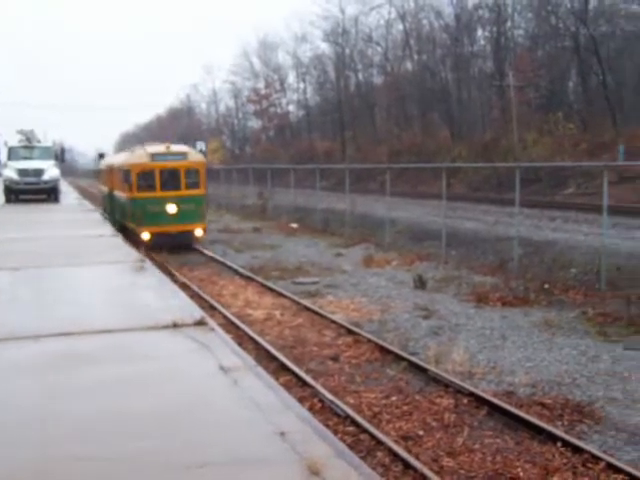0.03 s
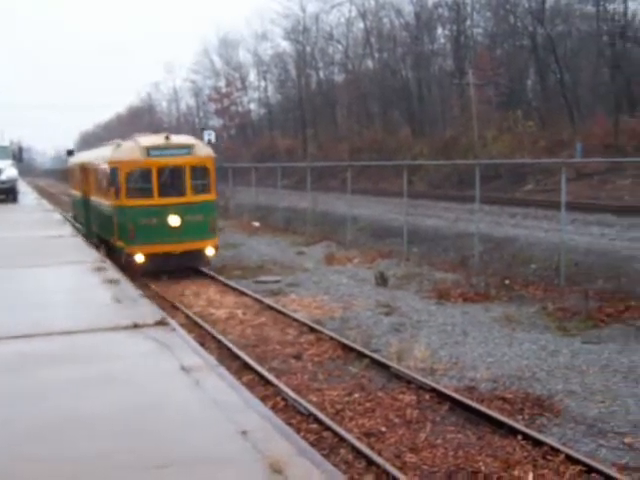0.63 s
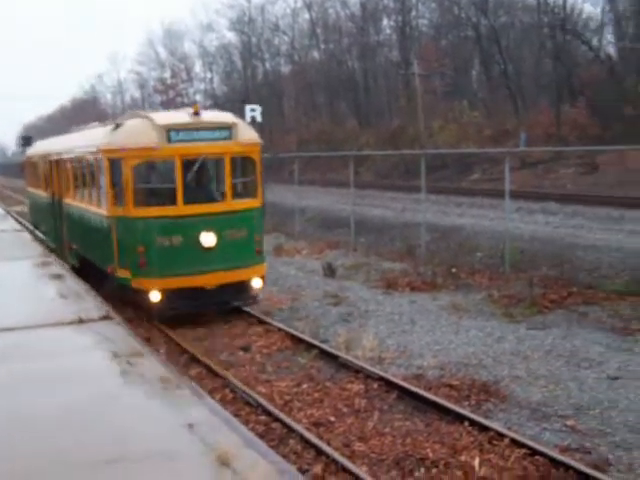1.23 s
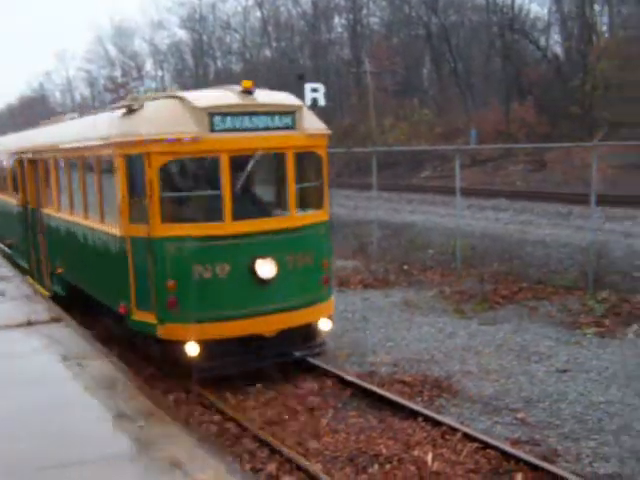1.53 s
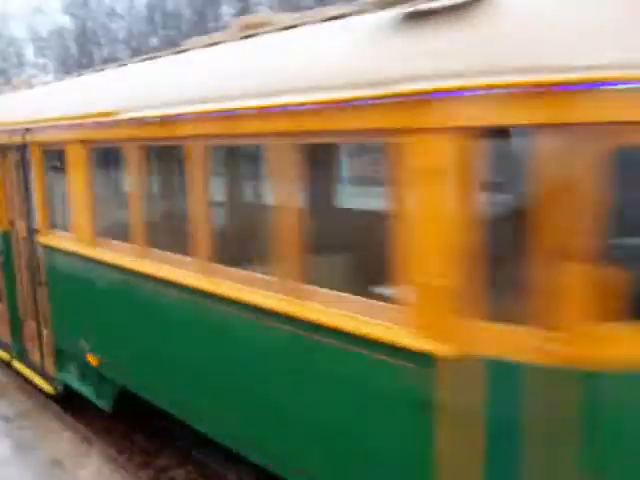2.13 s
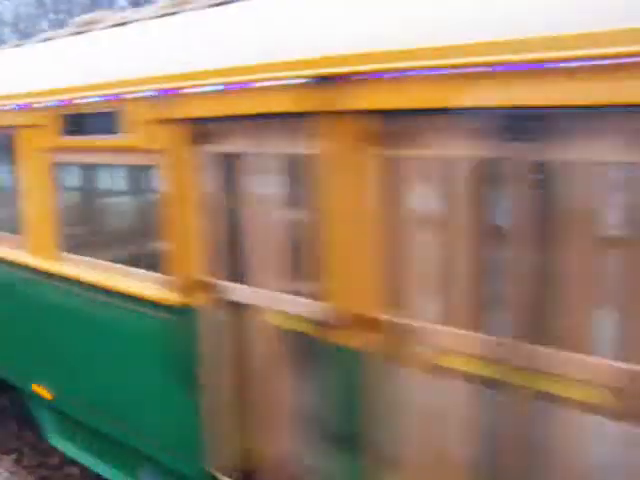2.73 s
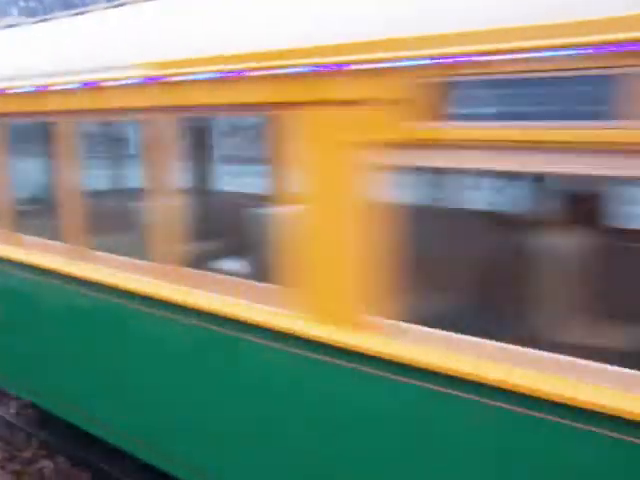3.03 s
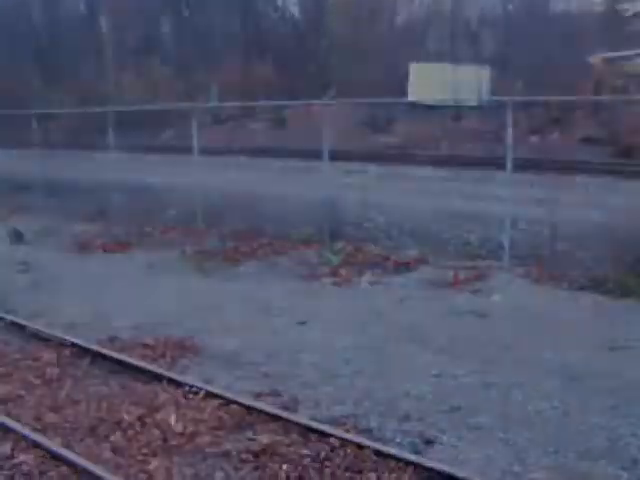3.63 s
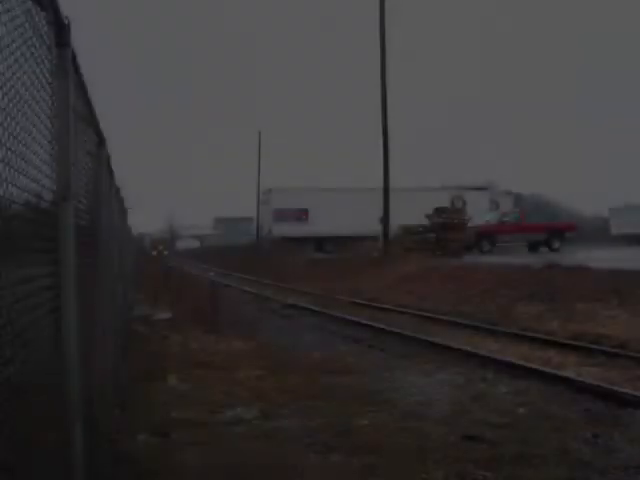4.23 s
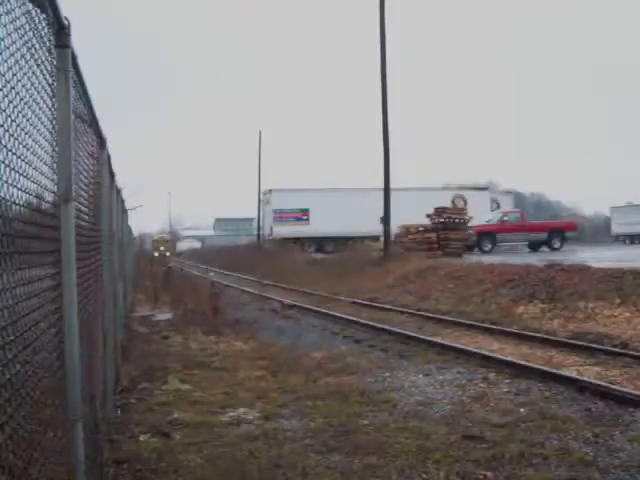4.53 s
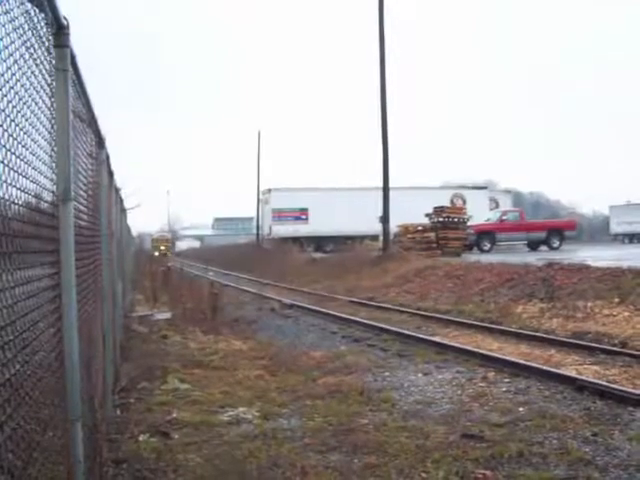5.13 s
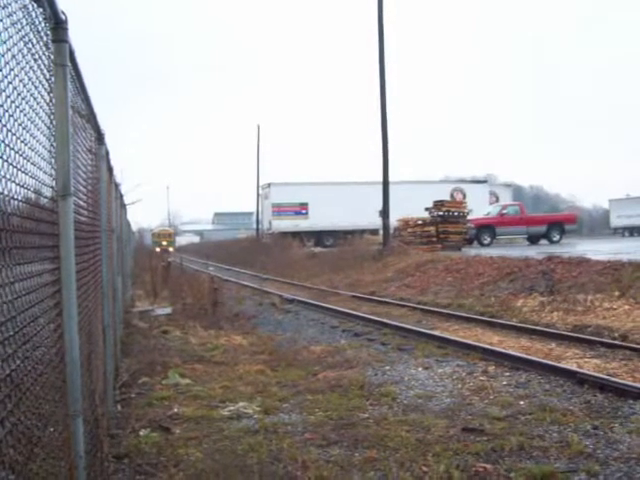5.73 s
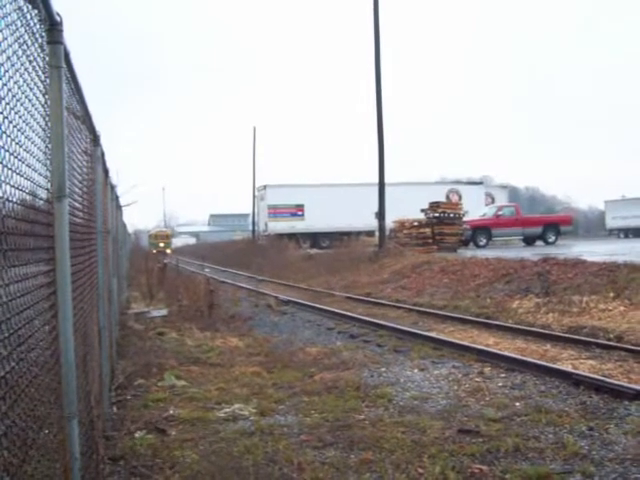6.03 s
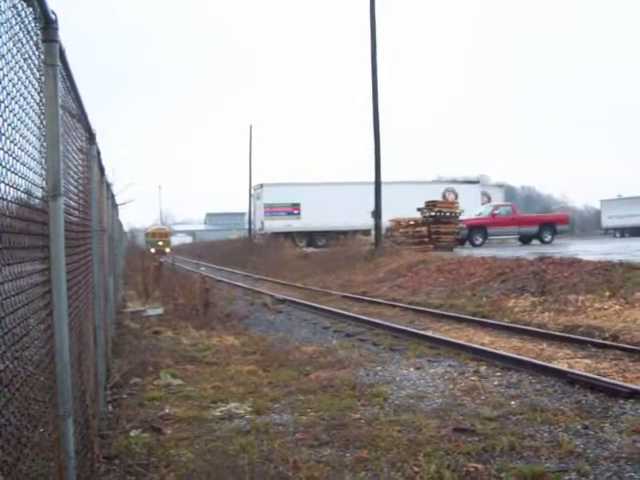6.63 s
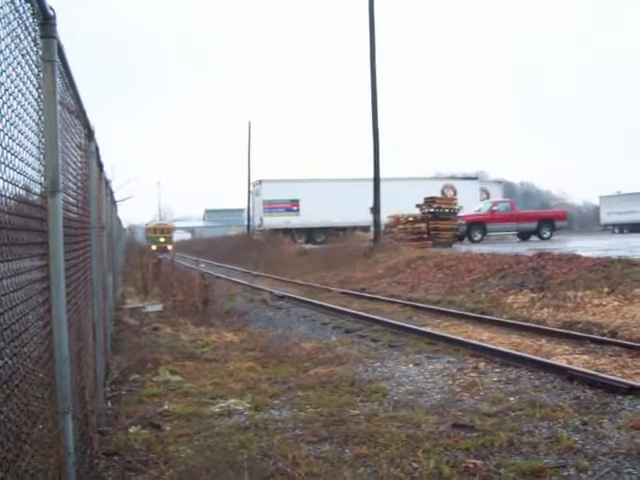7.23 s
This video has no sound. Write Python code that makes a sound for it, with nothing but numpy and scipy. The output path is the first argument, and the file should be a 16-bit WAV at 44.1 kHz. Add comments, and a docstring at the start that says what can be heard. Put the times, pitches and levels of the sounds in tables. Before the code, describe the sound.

An old streetcar approaches and passes close by, its body rumbling and its steel wheels hissing and ringing. A wheel knocks about five times a second amid deep thuds, clatter over rail joints and a gear growl. The car fades out, and a much quieter trackside fades in with distant traffic, an idling engine, wind on the microphone and faint scrapes and bumps.

```python
"""An old streetcar rumbles past close by, its steel wheels hissing and ringing on the rough rail.
A flat spot on a wheel knocks five times a second, the body thuds on its springs, and the trucks
(the frames that hold the wheels) growl with their gears and clatter over rail joints. The car fades
out and a quieter trackside fades in: far traffic, an idling engine, wind, faint scrapes and bumps.
It is all heard through a microphone that misses the highest treble."""
import sys
import numpy as np
from scipy import signal
from scipy.fft import rfft, irfft
from scipy.io import wavfile
from scipy.ndimage import map_coordinates

SR = 44100
rng = np.random.default_rng(int(sys.argv[2]) if len(sys.argv) > 2 else 0)


def store_wav(level_fs):
    """Save 16-bit WAV to argv[1]."""
    pcm = np.round(np.clip(np.atleast_2d(level_fs), -1, 1) * 32767)
    wavfile.write(sys.argv[1], SR, pcm.T.astype(np.int16))


N = 321048
TIME = np.arange(N) / SR
FREQ = np.fft.rfftfreq(N, 1 / SR)


def gain_of(db):
    """Turns decibels into a number to multiply a sound by."""
    return 10 ** (np.asarray(db) / 20)


def unit_level(x):
    """Scales a sound to an average (rms) level of 1."""
    return x / np.sqrt(np.mean(x ** 2) + 1e-20)


def spectrum(points):
    """Joins (Hz, dB) points into a curve over all pitches."""
    hz, db = np.transpose(points)
    return np.interp(np.log(FREQ + 1), np.log(hz + 1), db)


def colour(x, db):
    """Filters x by a dB curve, to level 1; a click rings only after it lands."""
    log_gain = np.maximum(db, -100) * np.log(10) / 20
    cepstrum = irfft(log_gain, N)
    cepstrum[1:N // 2] *= 2
    cepstrum[N // 2 + 1:] = 0
    return unit_level(irfft(rfft(x) * np.exp(rfft(cepstrum)), N))


def low_pass(x, hz):
    """Cuts off everything above a pitch."""
    taps = signal.firwin(401, hz, window=("kaiser", 8), fs=SR)
    return signal.oaconvolve(x, taps[None], "same")


def noise(size=N):
    """Plain white noise."""
    return rng.standard_normal(size)


def drift(hz, size=1024):
    """A random wobble, about 1 in size, up to hz times a second."""
    return np.sqrt(3 / 2) * np.interp(2 * hz * TIME, np.arange(size), noise(size), period=size)


def grit(per_s, spread_db, share):
    """Noise mixed with a share of tiny, uneven impacts."""
    sizes = gain_of(spread_db * np.minimum(rng.exponential(1, N), 4))
    impacts = sizes * np.sign(noise()) * (rng.random(N) < per_s / SR)
    return np.sqrt(share) * unit_level(impacts) + np.sqrt(1 - share) * noise()


def fuzzy_tone(hz, width, size=N):
    """The rough note of something rubbed without pause."""
    offset = np.fft.rfftfreq(size, 1 / SR) - hz
    return unit_level(irfft(rfft(noise(size)) / (1 + (2.3 * offset / width) ** 2), size))


def add(mix, s, sound):
    """Adds a sound to the mix at s seconds."""
    part = mix[max(round(s * SR), 0):][:len(sound)]
    part += sound[:len(part)]


def hump(at_s, width_s):
    """A bell-shaped rise and fall around a moment."""
    return np.exp(-((TIME - at_s) / width_s) ** 2)


def swells(rows):
    """The power of brief swells, each rising and falling in one arch."""
    return sum(gain_of(db) ** 2 * np.sin(np.pi * np.clip((TIME - s) / length, 0, 1)) ** 2
               for s, length, db in rows)


def fade(silent_s, full_s, power):
    """A volume knob turned between silence and full level."""
    return np.clip((TIME - silent_s) / (full_s - silent_s), 0, 1) ** power


def struck_notes(rows, rise_s=0.00099):
    """Each blow sounds one note, which drops 60 dB over its ring time."""
    t, out = np.arange(SR // 4) / SR, np.zeros(N)
    attack = 1 - np.exp(-t / rise_s)
    for s, hz, db, ring_s in rows:
        add(out, s, attack * gain_of(db - 60 * t / ring_s) * np.sin(2 * np.pi * hz * t))
    return out


# The idling engine and a faint whine. Each row: pitch in Hz, level in dB.
IDLE_TONES = [(32.3, -43.5), (152, -47), (200, -40), (231, -51), (1227, -57.5), (2309, -74.5)]


def idling_engine(waver_db=2.5, waver_hz=3.49):
    """An engine hums, each tone wavering in level and pitch."""
    out = np.zeros(N)
    for hz, db in IDLE_TONES:
        level = np.sqrt(2) * gain_of(db + waver_db * drift(9.2))
        pitch = hz + waver_hz * drift(8)
        out += level * np.sin(2 * np.pi * np.cumsum(pitch) / SR)
    return out


# The tone of wind, far traffic and high hiss. Each row: pitch in Hz, relative level in dB.
WIND_TONE = [(10, -20), (22, -2.5), (34, -9), (52, -1), (63, -3), (75, -10.5), (110, -10.5), (300, -63)]
TRAFFIC_TONE = [(60, -31.5), (100, -6.5), (135, 2.5), (220, 4), (300, 1), (420, -1.5), (560, 1),
                (680, -4.5), (830, -11.5), (1100, -17.5), (2000, -23), (5000, -44.5)]
AIR_TONE = [(500, -18), (1200, 1), (2050, -4.5), (2450, 0.5), (3150, -4), (3600, -3.5), (4400, -5),
            (5400, -11), (7000, -19), (8000, -34.5)]
# How the trackside grows louder. Each row: time in seconds, traffic gain in dB, hiss gain in dB.
TRACKSIDE_LEVELS = [(4.8, -39, -53), (5.2, -33, -46.5), (5.5, -30.5, -47), (5.9, -29, -44.5),
                    (6.2, -25.5, -41), (6.55, -25, -43), (7.0, -28, -43), (7.28, -25.5, -39)]
# Brief swells of hiss. Each row: start in seconds, length in seconds, level in dB.
AIR_SWELLS = [(6.09, 0.13, -39), (6.27, 0.11, -41.5), (6.93, 0.12, -42), (7.24, 0.03645, -31.5)]


def trackside(wind_db=-6.5, surge_db=0.9):
    """Wind buffets the microphone over far traffic, an engine and a swelling hiss."""
    times, *columns = np.transpose(TRACKSIDE_LEVELS)
    traffic_gain, hiss_gain = (gain_of(np.interp(TIME, times, db)) for db in columns)
    hiss_gain = np.sqrt(hiss_gain ** 2 + swells(AIR_SWELLS))
    wind = colour(noise(), spectrum(WIND_TONE)) * gain_of(wind_db)
    traffic = colour(grit(per_s=260, spread_db=2, share=0.16), spectrum(TRAFFIC_TONE))
    traffic *= gain_of(-1 + surge_db * drift(5))
    hiss = colour(grit(per_s=240, spread_db=3, share=0.15), spectrum(AIR_TONE))
    hiss *= gain_of(0.7 + 0.5 * drift(67))
    engine = idling_engine() / np.median(traffic_gain[-2 * SR:])
    return traffic_gain * (wind + traffic + engine) + hiss_gain * hiss


# Faint scrapes. Each row: start and length in seconds, pitch and width in Hz, level in dB.
SCRAPES = [(6.133, 0.06906, 3900, 2598, -39.5), (6.723, 0.054, 2250, 1100, -34.5),
           (6.725, 0.06703, 3950, 900, -38), (6.791, 0.014, 6800, 1101, -40),
           (6.765, 0.19, 2762, 1500, -39), (7.092, 0.2, 4240, 400, -46), (7.137, 0.074, 2750, 1200, -37.5),
           (7.248, 0.01774, 2899, 2600, -36)]


def scrapes(rise_s=0.0079, grain_db=1.5):
    """Grainy scrapes catch quickly and trail off."""
    out = np.zeros(N)
    for s, length, hz, width, db in SCRAPES:
        t = np.arange(round(length * SR)) / SR
        envelope = (1 - np.exp(-t / rise_s)) * np.sqrt(1 - t / length)
        add(out, s, gain_of(db) * envelope * fuzzy_tone(hz, width, size=SR)[:len(t)])
    return out * gain_of(grain_db * drift(79))


# One faint squeal: start and length in seconds, first and last pitch in Hz, level in dB.
SQUEAL = (6.5, .15, 2900, 3502, -44)


def squeal(waver_hz=35):
    """A thin, unsteady tone glides upward on its own, just before a run of scrapes."""
    s, length, from_hz, to_hz, db = SQUEAL
    hz = np.interp(TIME, [s, s + length], [from_hz, to_hz]) + waver_hz * drift(60)
    return np.sqrt(2 * swells([(s, length, db)])) * np.sin(2 * np.pi * np.cumsum(hz) / SR)


# Dull bumps. Each row: start in seconds, pitch in Hz, level in dB, ring time in seconds.
BUMPS = [(5.475, 202.8, -23.5, 0.18), (6.249, 522.1, -14, 0.03108), (7.125, 190, -22, 0.037),
         (7.232, 540.4, -13, 0.038)]


def bumps():
    """Short, low notes bump at the trackside."""
    return struck_notes(BUMPS)


# The two trucks going by. Each row: time in seconds, hiss in dB, gear level in dB, gear pitch in Hz.
TRUCKS = [(2.26, -24.5, -26, 576), (3.22, -32, -27, 620)]
# The gears' tones. Each row: share of the gear pitch, width in Hz, relative level in dB.
GEAR_TONES = [(.5, 55, -6), (1, 86, -0.5)]


def gears(lumps_db=3, lag_s=0.09, width_s=0.19):
    """Each drive gives a lumpy growl, loudest from close beside its truck."""
    out = np.zeros(N)
    for s, _, truck_db, hz in TRUCKS:
        for share, width, db in GEAR_TONES:
            level = gain_of(truck_db + db + lumps_db * drift(12))
            out += hump(s + lag_s, width_s) * level * fuzzy_tone(share * hz, width)
    return out


# The front wheels' notes. Each row: pitch in Hz, width in Hz, level in dB.
WHEEL_NOTES = [(1568, 93, -32), (2810, 150, -38.5), (3540, 170, -37.5)]


def singing_wheels(peak_s=1.4, width_s=0.62, flutter_db=4):
    """The front wheels ring on the rail as they draw near."""
    tones = sum(gain_of(db + flutter_db * drift(9)) * fuzzy_tone(hz, width)
                for hz, width, db in WHEEL_NOTES)
    return hump(peak_s, width_s) * tones


def receding(near_db, from_s, db_per_s, far_db):
    """A level that holds, then sinks as the car moves away."""
    return gain_of(np.maximum(near_db - db_per_s * np.maximum(TIME - from_s, 0), far_db))


# How rumble and hiss sink. Each: near gain in dB, start in seconds, dB lost a second, far gain in dB.
RUMBLE_FALL = (-16.5, 1.95, 6.5, -25.5)
HISS_FALL = (-27, 2, 8, -43.5)
# A wheel's rim rubs the rail. Each row: start in seconds, length in seconds, hiss gain in dB.
RIM_RUBS = [(.22, 0.23235, -27.5), (1.38, 0.2428, -29), (1.742, 0.037, -21.5), (2.2, 0.11, -30),
            (2.72, 0.3, -36.5), (3.04, 0.24, -38.5), (3.35, 0.1968, -34.5)]


def rolling_levels(rumble_dip_db=-4.5, hiss_dip_db=-1.5, dip_after_s=0.053):
    """Hiss rises with each truck and rub; rumble and hiss dip briefly after each joint."""
    dip = sum(hump(s + gap + dip_after_s, width_s=0.026) for s, gap, *_ in RAIL_JOINTS)
    alongside = sum((gain_of(db) * hump(s, width_s=0.35)) ** 2 for s, db, *_ in TRUCKS)
    hiss = np.sqrt(receding(*HISS_FALL) ** 2 + alongside + swells(RIM_RUBS))
    return receding(*RUMBLE_FALL) * gain_of(rumble_dip_db * dip), hiss * gain_of(hiss_dip_db * dip)


def wheel_boost(peaks):
    """The dB a wheel adds to contact noise near the pitches it rings at."""
    return sum(db / (1 + (2 * (FREQ - hz) / width) ** 2) for hz, width, db in peaks)


def flaring(x, depth_db=1.6, band_hz=65, flare_s=0.06):
    """Lets narrow bands of pitch swell and sink, each at its own moments."""
    frames = dict(nperseg=2048, noverlap=1536)
    hz, s, bands = signal.stft(x, SR, **frames)
    grid = np.meshgrid(hz / band_hz, s / flare_s, indexing="ij")
    flares = unit_level(map_coordinates(noise(bands.shape), grid, order=1, mode="mirror"))
    _, flared = signal.istft(bands * gain_of(depth_db * flares), **frames)
    return unit_level(flared[:N])


# The tone of the body's rumble and of steel on steel. Each row: pitch in Hz, relative level in dB.
BODY_TONE = [(20, -16), (60, -4.5), (85, -15), (125, 1), (220, -1), (285, 0.5), (365, -2), (450, 3),
             (560, 0.5), (680, -1), (900, -10.5), (1150, -17), (2200, -20), (6000, -56.5)]
STEEL_TONE = [(300, -30.5), (900, 3), (1400, -1.5), (2150, -0.5), (3100, 1), (4900, 1), (5600, -4),
              (6400, -6), (7000, -10.5), (7500, -13.5), (8000, -25)]
# Where the front and rear wheels ring. Each row: pitch in Hz, width in Hz, boost in dB.
FRONT_PEAKS = [(1577, 170, 10), (2619.2, 280, 5), (3584, 200, 6.5), (4370, 220, 6)]
REAR_PEAKS = [(1530, 400, 11), (2770, 100, 6), (3470, 240, 7), (4580, 280, 6)]


def rolling(handover_s=2.09, handover_length_s=0.8, pitch_wander=0.014):
    """Rough rail shakes the body and rings the wheels, first the front ones, then the rear."""
    rumble_gain, hiss_gain = rolling_levels()
    body = colour(grit(per_s=330, spread_db=1, share=0.27), spectrum(BODY_TONE))
    front, rear = (colour(grit(per_s=1100, spread_db=1, share=0.15),
                          spectrum(STEEL_TONE) + wheel_boost(peaks))
                   for peaks in (FRONT_PEAKS, REAR_PEAKS))
    passed = np.clip(0.5 + (TIME - handover_s) / handover_length_s, 0, 1)
    steel = np.sqrt(1 - passed) * front + np.sqrt(passed) * rear
    # the contact point wanders over the wheel, so the ringing wavers in pitch
    position = np.arange(N) + np.cumsum(pitch_wander * drift(7))
    steel = flaring(map_coordinates(steel, [position], order=3, mode="mirror"))
    body *= gain_of(-0.1 + 1.1 * drift(19))
    steel *= gain_of(2.5 + 0.97 * drift(27))
    return rumble_gain * body + hiss_gain * steel


# Deep, dead thuds. Each row: start in seconds, pitch in Hz, peak level in dB.
THUDS = [(0.536, 185.7, -9), (0.574, 190, -10), (0.653, 151, -11.5), (0.733, 160, -13), (0.801, 164, -4.5),
         (0.858, 135, -12), (1.648, 167, -10.5), (2.56, 135, -17), (2.665, 286, -6), (2.921, 139.9, -17),
         (2.942, 151.7, -21)]


def thuds(peak_s=0.0061):
    """The body bounces on its springs and settles in two or three swings."""
    t, out = np.arange(SR // 8) / SR, np.zeros(N)
    envelope = (t / peak_s * np.exp(1 - t / peak_s)) ** 2
    for s, hz, db in THUDS:
        add(out, s, gain_of(db) * envelope * np.sin(2 * np.pi * hz * t))
    return out


# Struck steel. Each row: start in seconds, pitch in Hz, level in dB, ring time in seconds.
STEEL_RINGS = [(1.708, 1352, -12.5, 0.11), (1.875, 1330, -14.5, 0.1)]


def steel_rings():
    """Now and then a blow sets one steel part ringing."""
    return struck_notes(STEEL_RINGS)


# The struck body's notes. Each row: pitch in Hz, relative level in dB, ring time in seconds.
BODY_NOTES = [(129.37, -10.5, 0.63), (180.99, -6, 0.077), (295, -4, 0.081), (334.52, -0.5, 0.039),
              (432, -5, 0.057), (555, -2.5, 0.073), (716, -7, 0.063), (863.5, -6.5, 0.12)]


def body_thump(t, centre_hz, rise_s=0.0014, detune=0.033, focus_db=9, lowest_hz=120):
    """A blow rings the body, favouring notes near centre_hz; each lands a little differently."""
    thump = np.zeros(len(t))
    for hz, db, ring_s in BODY_NOTES:
        envelope = gain_of(db - focus_db * np.log2(hz / centre_hz) ** 2 - 60 * t / ring_s)
        pitch = hz * (1 + detune * rng.normal())
        thump += envelope * np.sin(2 * np.pi * (pitch * t + 0.11 * rng.normal()))
    # the panels give off little sound below their lowest note
    bass_cut = signal.butter(3, lowest_hz, "highpass", fs=SR, output="sos")
    return signal.sosfilt(bass_cut, thump * (1 - np.exp(-t / rise_s)) ** 2)


def bouncing(strike, count=3, gap_s=0.0018, step_db=-4.5):
    """A struck wheel rebounds quickly, weaker each time."""
    out = strike.copy()
    for bounce, s in enumerate(np.cumsum(gap_s * rng.uniform(0.5, 1.5, count)), 1):
        add(out, s, gain_of(step_db * bounce) * strike)
    return out


# The flat spot, one row for each wheel turn. Each row: thump in dB, clank in dB.
FLAT_SPOT = [(-12.5, -29.5), (-16, -40.5), (-22, -30), (-12.5, -20), (-10, -14), (-11.5, -15),
             (-10.5, -18.5), (-15, -30), (-19.5, -29), (-21.5, -24), (-12.5, -14.5), (-12, -30),
             (-11.5, -25.5), (-16.5, -29), (-18, -38), (-20, -44)]
# A joint gives two blows, off one rail and onto the next.
# Each row: start and gap in seconds, then first thump, second thump, clank and rattle in dB.
RAIL_JOINTS = [(1.6922, 0.024, -7, -13.5, -21.5, -20), (1.873, 0.02025, -21, -19.5, -22.5, -34),
               (2.772, .016, -13.5, -21, -26, -47), (2.922, 0.023, -17.5, -16, -27, -34.5),
               (3.617, .019, -19, -22, -29, -41), (3.757, 0.036, -19.5, -20.5, -28, -33.5)]
# Jolts of the trucks and loose gear.
# Each row: start in seconds, thump, clank and rattle in dB, the thump's centre pitch in Hz.
JOLTS = [(0.102, -15.5, -34.5, -34, 447.3), (0.183, -17, -31, -32, 458), (0.305, -16, -35, -39, 553),
         (0.758, -9, -22.5, -36, 332), (0.801, -20.5, -32, -29, 163), (1.232, -18, -23.5, -41, 397.6),
         (1.272, -14, -38.5, -39.5, 437), (1.656, -26, -29.5, -21, 268.3), (1.8135, -19.5, -32, -18, 277.9),
         (1.837, -24, -23.5, -32.5, 330), (1.852, -13, -29.5, -38, 480),
         (2.337, -18.5, -33.5, -31.5, 579.2), (2.557, -16, -27, -22, 318.4),
         (2.722, -18.5, -21.5, -20, 274), (3.04, -21.5, -33, -29.5, 390), (3.187, -25, -36.5, -34, 644),
         (3.58, -26, -38, -48, 520)]


def blows(first_s=0.1492, turn_s=0.1939, flat_spot_hz=390, joint_hz=412):
    """Lists every blow from the flat spot, joints and jolts, laid out like a row of JOLTS."""
    for turn, (thump, clank) in enumerate(FLAT_SPOT):
        yield first_s + turn * turn_s, thump, clank, clank - 7, flat_spot_hz
    for s, gap, first, second, clank, rattle in RAIL_JOINTS:
        yield s, first, clank, rattle, joint_hz
        yield s + gap, second, clank - 0.5, rattle - 0.5, joint_hz
    yield from JOLTS


# The tone of a truck's clank. Each row: pitch in Hz, relative level in dB.
CLANK_TONE = [(150, -24), (400, -5.5), (800, 6), (1350, -1), (1800, 1.5), (2300, -3.5), (3000, -15.5),
              (7000, -27)]


def knocks(rise_s=0.0004, rattle_s=0.09, chatter_s=0.055, chatter_size=0.45):
    """At each blow the truck clanks, loose parts chatter, the wheel rattles and the body thumps."""
    t, out = np.arange(SR // 4) / SR, np.zeros(N)
    head = round(0.012 * SR)  # a blow's levels are set over its first 12 ms
    clank_tone = spectrum(CLANK_TONE) + 0.45 * wheel_boost(FRONT_PEAKS)
    rattle_tone = spectrum(STEEL_TONE) + wheel_boost(FRONT_PEAKS)
    chatter_noise = colour(noise(), clank_tone)
    rattle_noise = colour(grit(per_s=810, spread_db=3.5, share=0.17), rattle_tone)
    strike = colour(signal.unit_impulse(N), clank_tone)[:len(t)]
    strike /= np.std(strike[:head])
    attack = 1 - np.exp(-t / rise_s)
    for s, *levels_db, centre_hz in blows():
        here = (round(s * SR) + np.arange(len(t))) % N
        thump = body_thump(t, centre_hz)
        chatter = attack * chatter_noise[here] * gain_of(-60 * t / chatter_s)
        clank = bouncing(strike) + chatter_size * chatter
        rattle = attack * rattle_noise[here] * gain_of(-60 * t / rattle_s)
        for db, part in zip(levels_db, (thump, clank, rattle)):
            add(out, s, gain_of(db) * part / np.std(part[:head]))
    return out


def scene():
    """The passing car fades out, then the quiet trackside fades in."""
    car = rolling() + singing_wheels() + gears() + knocks() + thuds() + steel_rings()
    quiet = trackside() + scrapes() + squeal() + bumps()
    car *= fade(full_s=3.25, silent_s=4.098, power=0.67)
    quiet *= fade(silent_s=4.14, full_s=4.87, power=4.26)
    return (car + quiet)[None]


def record(dry):
    """The microphone loses the top treble; the hardest knocks overload it with a faint snap."""
    limit, headroom = 0.95, 0.05
    heard = low_pass(dry, hz=7880)
    clipped = np.clip(heard, -limit, limit)
    squashed_peaks = headroom * np.tanh((heard - clipped) / headroom)
    return low_pass(clipped + squashed_peaks, hz=15850)


dry = scene()
out = record(dry)
store_wav(out)
```